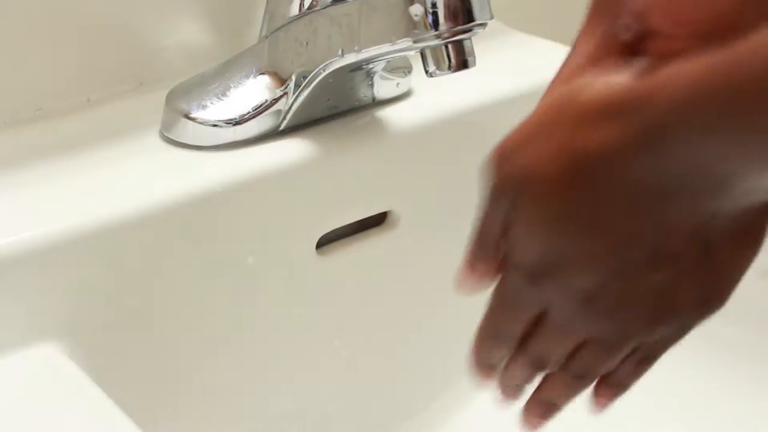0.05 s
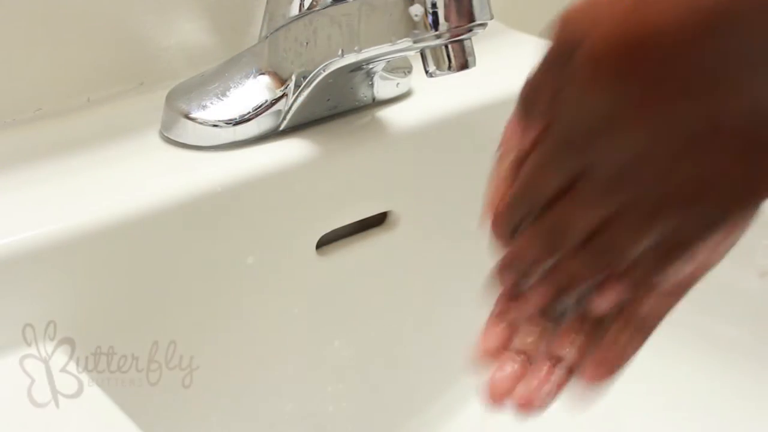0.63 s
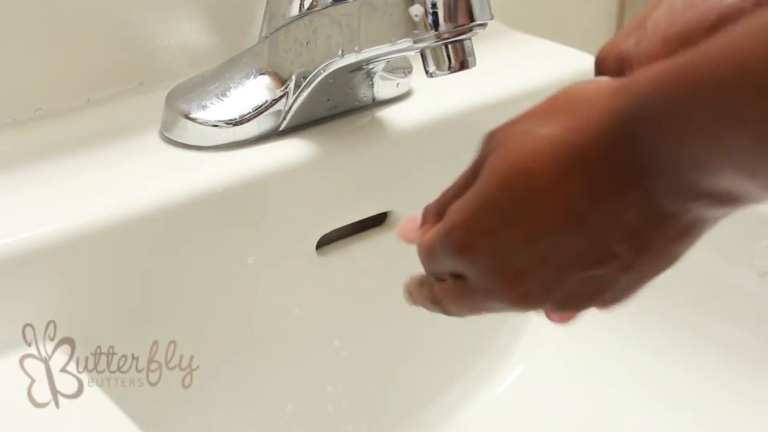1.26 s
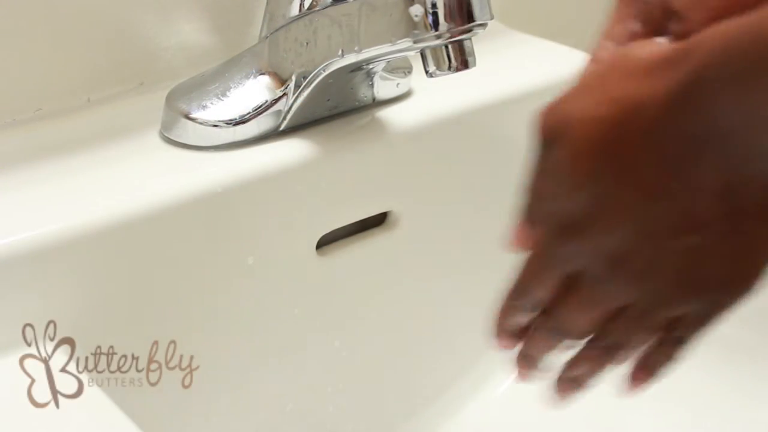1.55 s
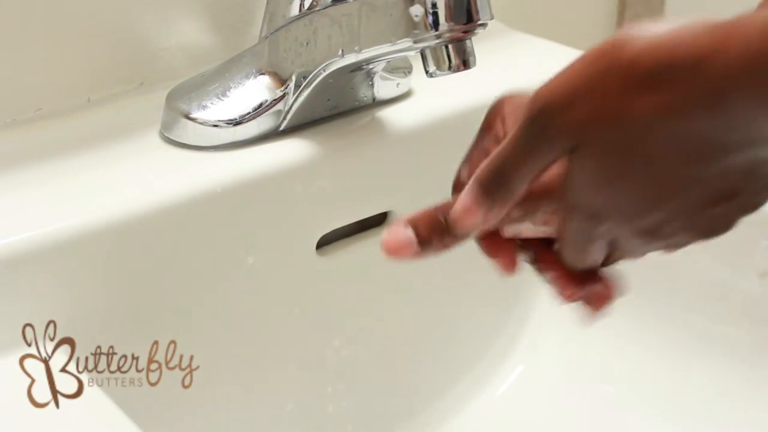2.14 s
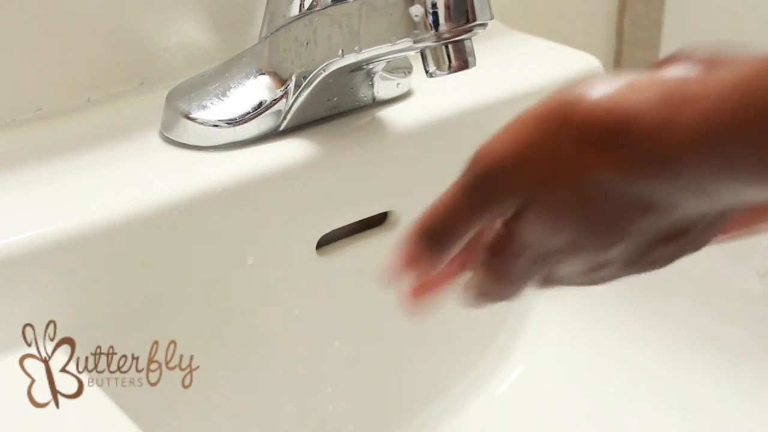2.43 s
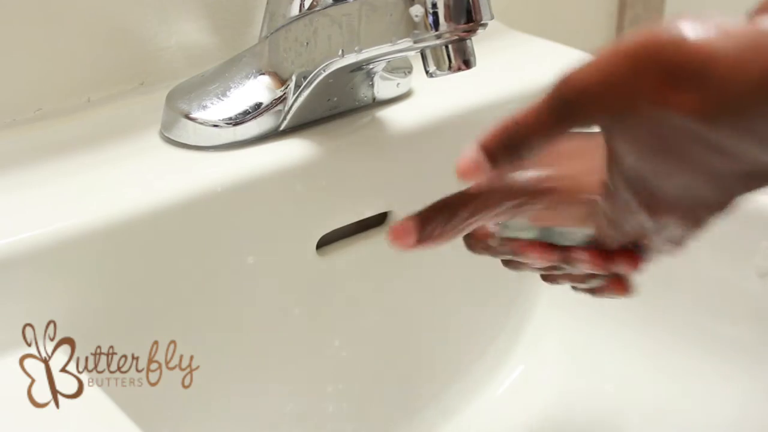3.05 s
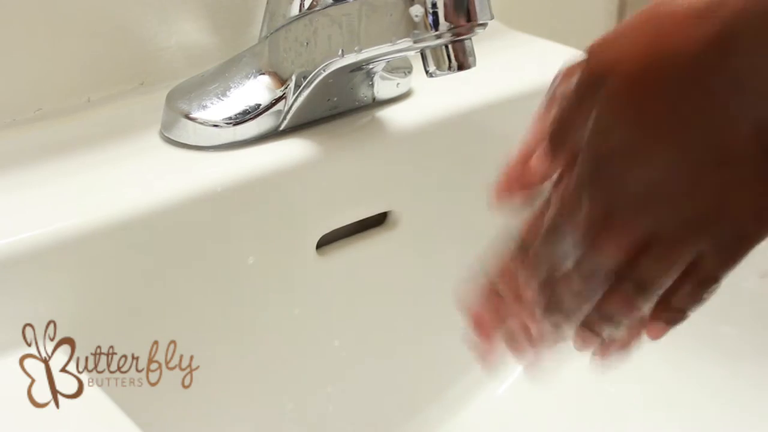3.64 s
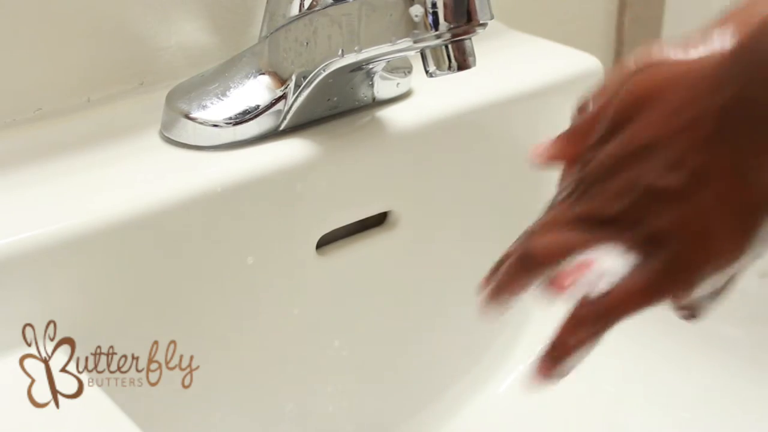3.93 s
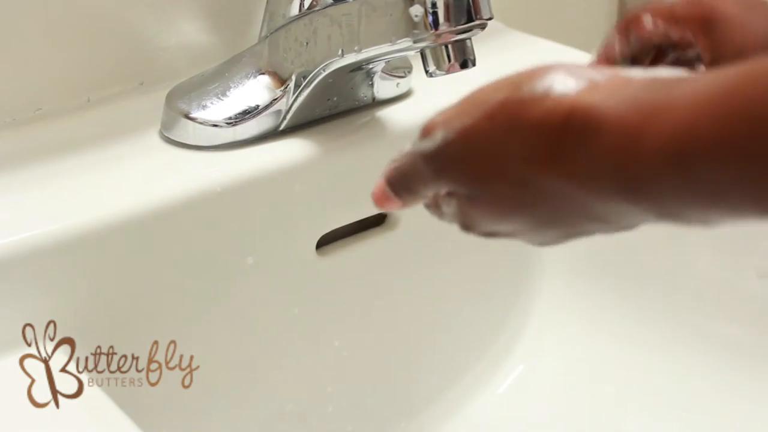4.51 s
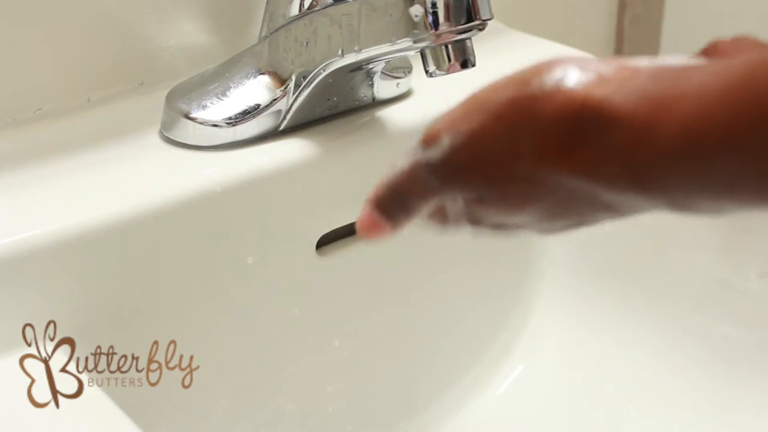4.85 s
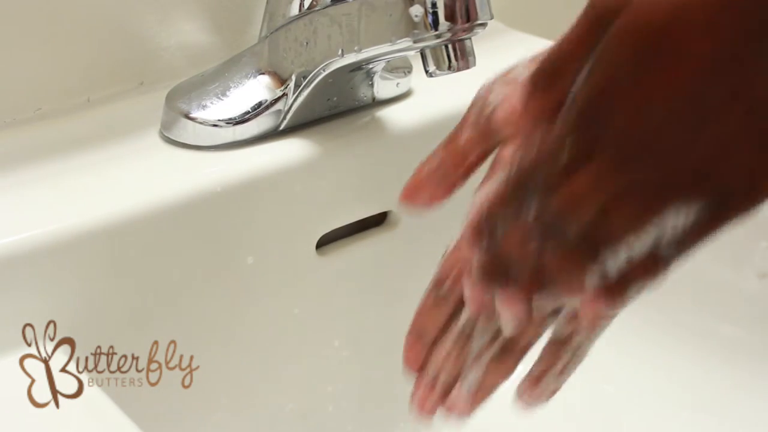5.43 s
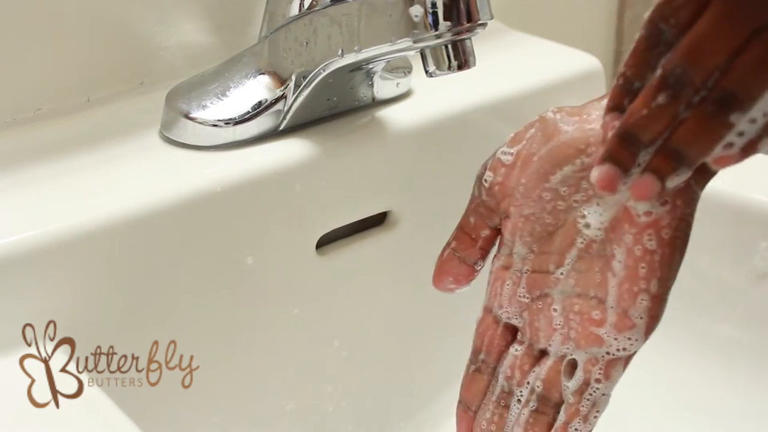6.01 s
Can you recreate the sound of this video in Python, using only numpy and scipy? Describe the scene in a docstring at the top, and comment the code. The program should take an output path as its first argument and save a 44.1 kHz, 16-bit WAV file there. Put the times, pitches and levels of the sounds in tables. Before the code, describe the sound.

Wet hands turn a bar of soap over a sink, close to the microphone in a small tiled room. Loud squelches and pops of trapped air open, with sticky clicks and a light fizz of lather. After a brief lull the squelches return in clusters, then thin out to a low gulp and a few soft rubs. A fan hums steadily underneath.

```python
"""Wet hands turn a bar of soap over a basin in a small tiled room; a fan runs throughout.
First 0.8 s: trapped air escapes in loud gulps and pops, wet films tear, lather fizzes under each stroke.
After a lull, the squelches return in clusters from 1.4 to 4 s, then thin out.
A low gulp at 4.8 s, a thin jet of air through the foam, and soft last strokes from 5.3 to 5.6 s.
The basin rings along and the hard walls give each squelch a short tail."""
import sys
import numpy as np
from scipy import signal
from scipy.fft import rfft, irfft
from scipy.io import wavfile

SR = 44100
rng = np.random.default_rng(int(sys.argv[2]) if len(sys.argv) > 2 else 0)


def wrap_up_sound(samples):
    """Save the sound to the file named by the first command line argument, as 16-bit audio."""
    columns = np.atleast_2d(samples).T
    # keep every value between -1 and 1, then stretch to whole-number steps
    tamed = np.clip(columns, -1, 1)
    steps = np.round(tamed * 32767).astype(np.int16)
    wavfile.write(sys.argv[1], SR, steps)


N = 276507

# air squeezed from the palms: (time [s], level [dB], pitch [Hz], spatter [dB re level])
PALM_GULPS = [(.02, -25.5, 962, -0.5), (.069, -20, 910, -1), (.304, -22, 1393, 5.5),
              (.427, -21.5, 1416, -4.5), (0.448, -22, 1466, -3.5), (0.5486, -17, 965, -9.5),
              (.582, -24, 1270, -17), (.677, -15.5, 877.6, -7.5), (.764, -28, 940, -5),
              (1.467, -31.5, 1407, -4), (1.598, -32.5, 1584, -2.5), (1.81, -19, 1108, -8),
              (1.939, -18.5, 960, -8), (1.95, -19.5, 980, -1), (1.997, -28.5, 981, -2),
              (2.309, -39, 1266, -1.5), (2.372, -33.5, 1220, -20), (2.63, -28.5, 882, -9),
              (2.673, -29, 1400, -14), (2.87, -36, 843, 2), (2.931, -29.5, 1162, 5.5),
              (3.019, -25, 1344, 0.5), (3.509, -31, 1438, 0), (3.525, -25, 1510, -15),
              (3.663, -27, 1040, -18), (3.871, -39, 1395, 5.5), (3.934, -28.5, 1590, -18),
              (4.257, -44, 1380, -1), (4.794, -34.5, 684, -7), (4.822, -29, 446, -4.5),
              (5.495, -37, 1096, -8), (5.558, -38.5, 987, -12)]
# air pockets between fingers and soap: (time [s], level [dB], pitch [Hz], spatter [dB re level])
FINGER_POPS = [(.022, -23.5, 2540, -1), (.07, -17, 3560, -6.5), (.299, -11.5, 3730, -10),
               (.3035, -10, 3670, -6.5), (.4268, -11, 3226, -4), (.548, -28, 2420, -9),
               (.5825, -20, 3600, -5), (.6795, -17, 3360, -24), (.766, -31, 2120, -8),
               (1.573, -25.5, 3330, -13), (1.809, -20.5, 3490, -15), (1.872, -30.5, 3350, -18),
               (1.938, -25, 3280, -10), (1.9425, -15, 3270, -11), (2.371, -31.5, 4000, 4.5),
               (2.505, -27.5, 3350, 2.5), (2.574, -32, 3320, -3), (2.5795, -10.5, 3093, -4.5),
               (2.78, -25, 3120, -7), (2.923, -30, 2690, -10), (2.931, -23, 3070, -7),
               (3.06, -31, 3950, -1), (3.698, -34.5, 2560, -11), (3.729, -33, 2400, -15),
               (3.871, -28, 3320, -4.5), (4.794, -34, 3050, 5.5)]
# wet films parting: (time [s], level [dB], top-octave spit [dB])
FILM_TEARS = [(0.0213, -23, -29), (0.0677, -20, -18.5), (.187, -34, -19), (0.3006, -17, -19),
              (0.4271, -24, -26), (0.582, -23.5, -19), (0.6768, -15, -18), (1.4494, -39.5, -11),
              (1.574, -32.5, -32), (1.8119, -24, -25), (1.8716, -34, -22), (1.95, -26.5, -26),
              (1.998, -27.5, -32), (2.3093, -33, -27), (2.366, -28, -15), (2.42, -32.5, -27),
              (2.58, -35, -7), (2.634, -37, -7.5), (2.7708, -34, -19), (2.8557, -40.5, -7.5),
              (3.053, -33, -20), (3.1254, -37, -18), (3.5101, -34.5, -6.5), (3.6596, -37, -19),
              (3.8709, -24, -18.5), (4.127, -37, -23), (4.251, -50, -4), (5.2842, -30.5, -26),
              (5.485, -34.5, -12), (5.6032, -37, -28)]
# snap of a film: (frequency [Hz], gain [dB])
SNAP_SPECTRUM = [(400, -22), (1000, -3), (3500, 2.5), (6000, 2), (8500, -1.5), (11000, -18.5),
                 (16000, -20.5)]
# spit of a film: (frequency [Hz], gain [dB])
SPIT_SPECTRUM = [(7000, -25), (10500, 6.5), (16000, -2)]
# hand over hand: (start [s], length [s], swell [s], fizz [dB], squish [dB])
HAND_STROKES = [(0, 0.048, 0.0018, -38, -30.5), (.18, 0.064, 0.022, -41, -37),
                (0.286, 0.22, .008, -49, -41), (0.517, 0.27, 0.019, -47.5, -46.5),
                (1.01, 0.2, 0.14, -50, -48), (1.43, 0.2, .015, -51, -43), (1.68, 0.21, 0.014, -50.5, -40.5),
                (1.934, 0.076, .015, -45, -33.5), (2.25, 0.32, 0.025, -51.5, -46),
                (2.56, 0.27, 0.018, -48, -42), (2.851, 0.084, .015, -50.5, -39.5),
                (2.99, 0.11, 0.028, -48.5, -42), (3.238, 0.13, .04, -61, -50.5),
                (3.5, 0.058, .02, -44, -48), (3.619, 0.12, 0.049, -47.5, -44.5),
                (3.88, .25, .02, -52.5, -44), (4.137, .25, .03, -59, -57), (4.77, 0.11, .02, -61, -54),
                (5.285, .14, .015, -51.5, -48), (5.42, 0.11, 0.053, -47.5, -46),
                (5.555, 0.073, 0.018, -51.5, -49)]
# fine bubbles: (frequency [Hz], gain [dB])
FIZZ_SPECTRUM = [(1500, -12.5), (3000, 3.5), (4500, 1.5), (7000, -5.5), (10000, -10), (16000, -12)]
# coarse bubbles: (frequency [Hz], gain [dB])
SQUISH_SPECTRUM = [(300, -11.5), (600, -11.5), (1000, -4), (1600, -3.5), (2400, -3.5), (3500, -5),
                   (6000, -35)]
# basin resonances: (frequency [Hz], level [dB])
BASIN_MODES = [(606, -5.5), (842, -3.5), (915, -9.5), (980, -16), (1060, -9), (1426, -8.5), (1575, -15)]
# room tail decay: (frequency [Hz], T60 [s])
TAIL_T60 = [(500, .5), (1200, 0.44), (3500, 0.48), (9000, 0.43), (16000, 0.3)]
# room tail colour: (frequency [Hz], gain [dB])
TAIL_SPECTRUM = [(400, -3), (800, -1), (1200, 1.5), (1700, 3), (3300, -5.5), (6000, -1.5), (14000, -3)]
# fan hum: (frequency [Hz], rms level [dB])
FAN_TONES = [(54.6, -51.5), (81.6, -46), (120, -44), (143, -49.5), (182, -50.5), (222, -48.5),
             (258.3, -36.5), (313, -49), (403, -64.5), (603, -58)]
# fan airflow: (frequency [Hz], gain [dB])
RUSH_SPECTRUM = [(12, -45), (20, -12), (110, -2.5), (182, -4.5), (255, -8.5), (277, -3), (367, -10),
                 (542, -15), (607, -20), (660, -21), (976, -25.5), (1260, -27.5), (3250, -38.5),
                 (14700, -44.5), (16000, -43)]


def gulps():
    """Large, low air pockets escape from the hollow of the palms."""
    return amp(-0.5) * squelches(PALM_GULPS, base_cycles=2.15, rise=0.075, count=20, spread_oct=0.68,
                                 small_cycles=0.99, lead_s=0.001848, mean_delay_cycles=9.5)


def pops():
    """Small, high air pockets burst between fingers and soap."""
    return amp(1.0) * squelches(FINGER_POPS, base_cycles=2.7, rise=0.038, count=14, spread_oct=0.5,
                                small_cycles=1.4, lead_s=0.001099, mean_delay_cycles=7.5)


def squelches(rows, base_cycles, rise, count, spread_oct, small_cycles, lead_s, mean_delay_cycles):
    """Each main pocket bursts amid a spatter of lesser ones; low pockets spatter longer."""
    out = np.zeros(N)
    for time_s, db, hz, spatter_db in rows:
        ring_cycles = base_cycles * amp(-(spatter_db + 3.5) / 4)  # less spatter, longer ring
        add(out, time_s, amp(db) * pocket(hz, ring_cycles / hz, rise))
        quantiles = (np.arange(count) + rng.uniform(.5, 1, count)) / count
        delays_s = -mean_delay_cycles / hz * np.log(quantiles) - lead_s
        detune = 2 * (rng.permutation(count) + rng.random(count)) / count - 1
        pitches_hz = hz * 2 ** (spread_oct * detune)
        for delay_s, pitch_hz, sign in zip(delays_s, pitches_hz, rng.choice([-1, 1], count)):
            spatter = sign * pocket(pitch_hz, small_cycles / pitch_hz, rise) / 2
            add(out, time_s + delay_s, amp(db + spatter_db) * spatter)
    return out


def pocket(hz, decay_s, rise):
    """One air pocket rings; its pitch rises as the opening widens."""
    age = np.arange(2600) / SR / max(decay_s, 1e-4)
    pitch_hz = hz * (1 + rise * (1 - 2 * np.exp(-age / 2)))
    swell = (1 - np.exp(-2 * age)) * np.exp(-age)
    return swell / swell.max() * np.sin(2 * np.pi * np.cumsum(pitch_hz) / SR)


def tears(decay_s=0.0019):
    """Skin peels away: a wet film stretches with a faint crackle, then parts in a run of tiny snaps."""
    out, lead = np.zeros(N), SR // 40
    t = np.arange(-lead, SR // 10) / SR
    age = np.maximum(t, 0) / decay_s
    parting = (1 - np.exp(-3 * age)) * np.exp(-age)
    stretching = amp(-27) * np.exp(-abs(t) / 0.013)
    gain = np.sqrt(3.63 * np.mean(parting ** 2))
    for time_s, db, spit_db in FILM_TEARS:
        clicks = crackle(per_s=4500, spread_db=2.0, samples=len(t)) * (parting + stretching)
        snap = amp(-4.5) * unit(colour(clicks, SNAP_SPECTRUM))
        spit = amp(spit_db + 6.5) * unit(colour(clicks, SPIT_SPECTRUM))
        add(out, time_s - lead / SR, gain * amp(db) * (snap + spit))
    return out


def lather():
    """Bubbles burst in clumps under the sliding hands: fine ones fizz, coarse ones squish."""
    fizz_level, squish_level = foam_levels()
    fine = crackle(per_s=1000, spread_db=3.5)
    fizz = unit(colour(fine, FIZZ_SPECTRUM) * amp(2 * drift(rate_hz=81)))
    coarse = np.zeros(N)
    for hz in np.geomspace(500, 5000, 16):
        bursts = crackle(per_s=60, spread_db=-1.0)
        coarse += signal.oaconvolve(bursts, pocket(hz, decay_s=1.7 / hz, rise=0.091))[:N] * np.sqrt(hz)
    squish = unit(colour(coarse, SQUISH_SPECTRUM) * amp(1.1 * drift(rate_hz=43)))
    return amp(-1.0) * fizz * fizz_level + amp(-8.5) * squish * squish_level


def foam_levels(wake_db=-18, wake_decay_s=0.024):
    """Fizz and squish envelopes: idle foam, strokes and the wake of each gulp add in power."""
    fizz_power = np.full(N, amp(-65) ** 2)
    squish_power = np.full(N, amp(-60) ** 2)
    for start_s, length_s, swell_s, fizz_db, squish_db in HAND_STROKES:
        pressure = stroke(start_s, length_s, swell_s)
        fizz_power += (amp(fizz_db) * pressure) ** 2
        squish_power += (amp(squish_db) * pressure) ** 2
    wake = np.exp(-np.arange(SR // 2) / SR / wake_decay_s)
    for time_s, db, _, _ in PALM_GULPS:
        add(squish_power, time_s, (amp(db + wake_db) * wake) ** 2)
    return np.sqrt(fizz_power), np.sqrt(squish_power)


def stroke(start_s, length_s, swell_s, sag_db_per_s=11.5, release_s=0.015):
    """Hand pressure swells, eases as it slides, then lets go."""
    age_s = np.maximum(np.arange(N) / SR - start_s, 0)
    release = np.exp(-np.maximum(age_s - length_s, 0) / release_s)
    return np.minimum(age_s / swell_s, 1) * amp(-sag_db_per_s * age_s) * release


def air_jet(time_s=4.897, level_db=-48, centre_hz=13800, width_hz=2400, decay_s=0.018):
    """A thin jet of air through the foam: one brief, very high hiss."""
    out, t = np.zeros(N), np.arange(SR // 5) / SR
    band = np.exp(-((np.fft.rfftfreq(len(t), 1 / SR) - centre_hz) / width_hz) ** 2)
    add(out, time_s, amp(level_db) * noise(band, len(t)) * np.exp(-t / decay_s))
    return out


def basin(hands, t60_s=0.4):
    """The basin rings in fixed modes, driven by the hand sounds."""
    t = np.arange(SR) / SR
    response = np.zeros(SR)
    for hz, db in BASIN_MODES:
        mode = np.sin(2 * np.pi * (hz * t + rng.random())) * np.exp(-np.log(1000) * t / t60_s)
        response += amp(db - 15.5) * mode / np.linalg.norm(mode)
    return signal.fftconvolve(hands, response)[:N]


def reflections(hands, places=9, places_per_s=14):
    """Reflections change as the hands circle from place to place."""
    out = np.zeros(N)
    position = places_per_s * np.arange(N) / SR
    for place in range(places):
        distance = abs((position - place + places / 2) % places - places / 2)
        share = np.cos(np.pi / 2 * np.minimum(distance, 1))  # equal-power crossfade
        out += signal.fftconvolve(hands * share, room_response())[:N]
    return out


def room_response(scatter_db=-3.5, scatter_decay_s=0.0077):
    """Close scatter off the porcelain plus the tail of the tiled room, for one hand position."""
    t = np.arange(SR) / SR
    hz, frame_s, bands = signal.stft(rng.standard_normal(SR), SR, nperseg=256)
    decay_per_s = np.log(1000) / read(TAIL_T60, hz)[:, None]
    envelope = np.exp(-decay_per_s * frame_s) * np.sqrt(2 * decay_per_s / SR)  # unit energy
    bands *= amp(read(TAIL_SPECTRUM, hz))[:, None] * envelope
    tail = signal.istft(bands, SR, nperseg=256)[1][:SR] * (1 - np.exp(-t / 0.0015))
    scatter = rng.standard_normal(SR) * (1 - np.exp(-t / 0.00043)) * np.exp(-t / scatter_decay_s)
    return tail + amp(scatter_db) * scatter / np.linalg.norm(scatter)


def fan(rush_db=-38.5):
    """Wavering tones over a low rush of air."""
    t, hz = np.arange(N) / SR, np.fft.rfftfreq(N, 1 / SR)
    out = amp(rush_db) * noise(amp(read(RUSH_SPECTRUM, hz)))
    strongest_db = max(db for _, db in FAN_TONES)
    for tone_hz, db in FAN_TONES:
        waver = 0.1 + 0.022 * (strongest_db - db)  # weak tones are least steady
        phase = 2 * np.pi * (tone_hz * t + rng.random())
        level = amp(db) * np.sqrt(2) * (1 + waver * drift(rate_hz=2.1))
        out += level * np.sin(phase + waver * drift(rate_hz=2.9))
    return out


def crackle(per_s, spread_db, samples=N):
    """Random clicks of either sign, exponentially spread in dB."""
    size = amp(spread_db * np.minimum(rng.exponential(1, samples), 4))
    return size * rng.choice([-1., 1.], samples) * (rng.random(samples) < per_s / SR)


def noise(gain, samples=N):
    """Noise shaped by a gain per FFT bin, rms 1."""
    return unit(irfft(rfft(rng.standard_normal(samples)) * gain, samples))


def drift(rate_hz):
    """Random motion below rate_hz, rms 1."""
    return noise(1 / (1 + (np.fft.rfftfreq(N, 1 / SR) / rate_hz) ** 4))


def colour(x, spectrum, size=2048):
    """Minimum-phase filter with the given spectrum."""
    log_gain = np.log(amp(read(spectrum, abs(np.fft.fftfreq(size, 1 / SR)))))
    taps = np.fft.ifft(np.exp(np.conj(signal.hilbert(log_gain)))).real
    return signal.fftconvolve(x, taps[:size // 2])[:len(x)]


def read(table, hz):
    """Interpolates on a log-frequency axis."""
    table_hz, values = np.transpose(table)
    return np.interp(np.log(hz + 1), np.log(table_hz + 1), values)


def add(mix, time_s, sound):
    """Mixes a sound in at time_s."""
    start = round(time_s * SR)
    sound = sound[max(-start, 0):]
    part = mix[max(start, 0):][:len(sound)]
    part += sound[:len(part)]


def amp(db):
    """dB to amplitude."""
    return 10 ** (np.asarray(db) / 20)


def unit(x):
    """Scales to rms 1."""
    return x / np.sqrt(np.mean(x ** 2) + 1e-20)


def scene():
    """Hands, basin, room and fan in mono."""
    hands = gulps() + pops() + tears() + lather() + air_jet()
    return (hands + basin(hands) + reflections(hands) + fan())[None]


def record(dry):
    """Low-pass at 16 kHz."""
    taps = signal.firwin(511, 16000, window=("kaiser", 9), fs=SR)
    return signal.oaconvolve(dry, taps[None], "same")


dry = scene()
out = record(dry)
wrap_up_sound(out)
```